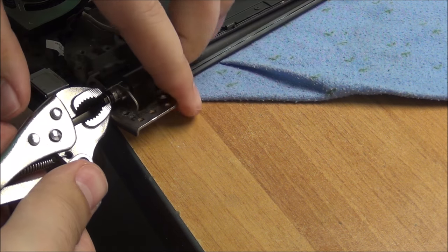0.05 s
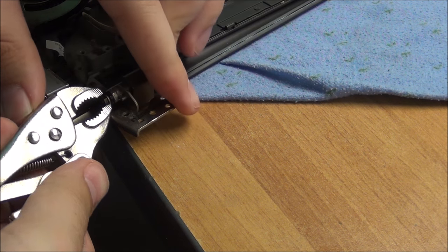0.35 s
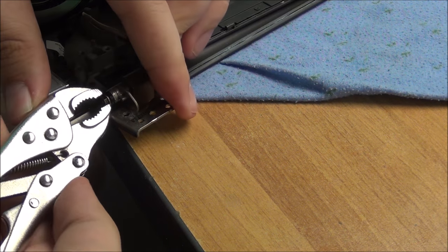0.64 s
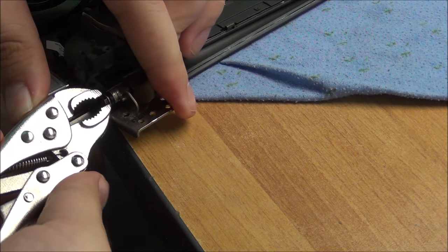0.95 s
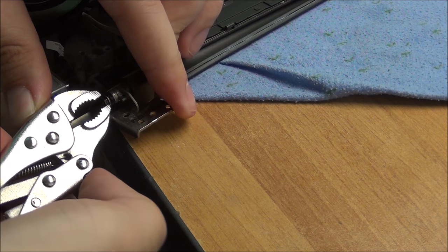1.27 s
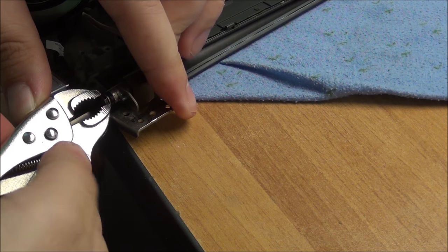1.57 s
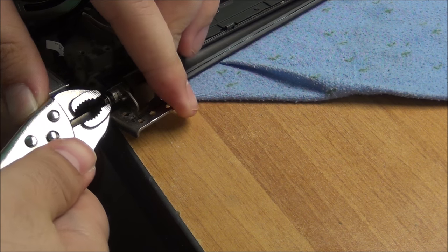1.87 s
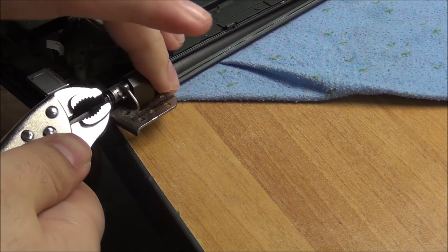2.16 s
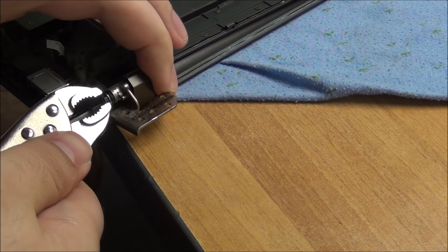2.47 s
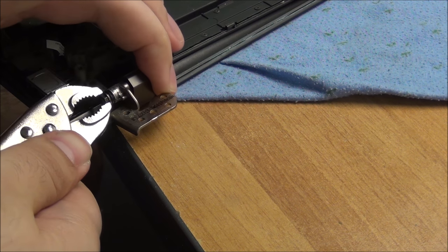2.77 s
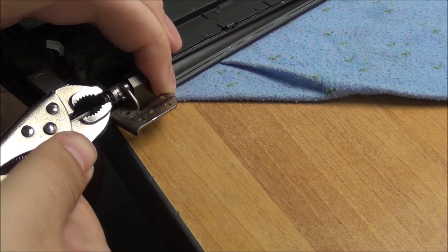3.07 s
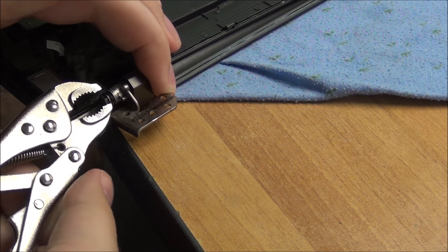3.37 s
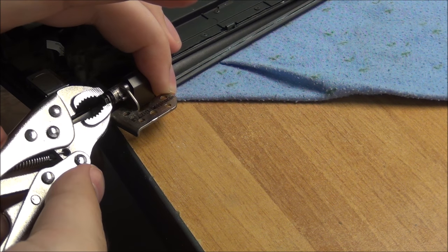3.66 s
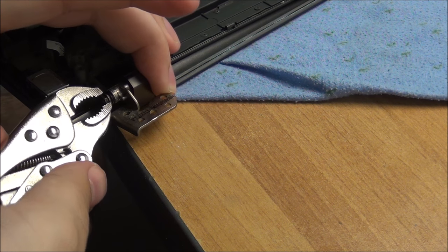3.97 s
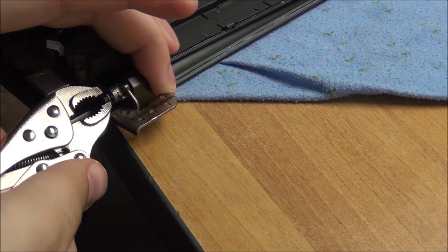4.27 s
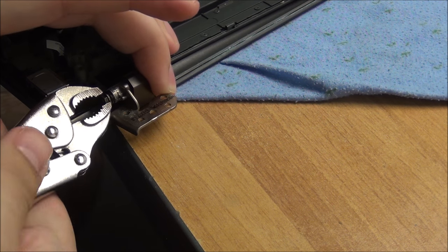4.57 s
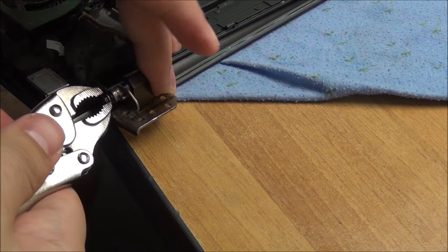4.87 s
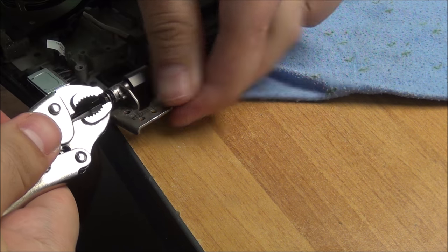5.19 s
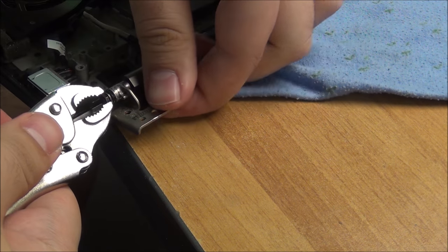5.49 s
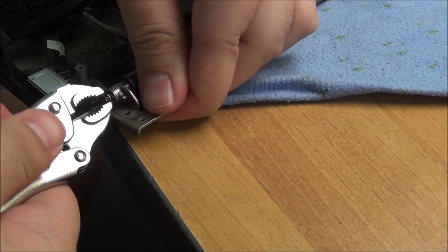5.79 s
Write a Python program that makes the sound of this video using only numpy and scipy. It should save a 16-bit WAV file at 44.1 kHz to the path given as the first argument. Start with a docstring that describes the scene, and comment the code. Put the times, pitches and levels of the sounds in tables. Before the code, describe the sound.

Locking pliers spring open and snap shut with sharp metallic cracks, amid small ticks and hollow knocks of a hinge in a plastic case.

```python
"""Locking pliers twist the steel shaft of a hinge in a plastic case on a wooden desk, in a quiet room.
A near camera hisses throughout; at first its focus motor pulses faintly. A hand bumps the case, then
the hinge knocks in it, exciting its modes and a thud of the desk. Near 3.2 s the pliers spring open and
the case bounces; they tick as they are shifted, and near 4 s snap shut with a crack and a steel ring.
More ticks, bumps and knocks follow, fingers rub with friction noise, and the motor runs again briefly."""
import sys
import numpy as np
from scipy import signal
from scipy.fft import rfft, irfft
from scipy.io import wavfile
from scipy.ndimage import uniform_filter1d

SR = 44100
rng = np.random.default_rng(int(sys.argv[2]) if len(sys.argv) > 2 else 0)


def transcribe(u):
    """Save the signal u as a 16-bit wav file named by the first command-line argument.

    u: samples, shape (n,) or (channels, n), limited to [-1, 1]; the rate is SR.
    q: integer samples, one column per channel.
    """
    v = np.clip(np.atleast_2d(u).T, -1, 1)
    q = np.round(v * 32767).astype(np.int16)
    wavfile.write(sys.argv[1], SR, q)


N = 265923
T = np.arange(SR // 4) / SR  # time axis of one blow [s]
SEAT_HZ, SEAT_LAG_S = 125, .011  # a knock or snap pushes the case onto the desk, a moment later
# spectrum of the hinge striking plastic: (frequency [Hz], spectral level [dB])
CLACK_SPECTRUM = [(60, -22), (200, -6), (330, -2), (620, 0), (830, -7), (1180, 1), (1600, -3), (1950, -8),
                  (2400, -6), (3000, -12), (5000, -28), (16000, -52)]


def gain_of(db):
    """Amplitude ratio of a level in decibels."""
    return np.exp(np.asarray(db) * (np.log(10) / 20))


def unit_rms(x):
    """Power normalisation: scales a signal to rms 1."""
    return x / np.sqrt(np.mean(x ** 2) + 1e-20)


def unit_blow(x):
    """Energy normalisation: scales a blow to the energy of 5 ms at full level."""
    return x * np.sqrt(SR / 200 / (np.sum(x ** 2) + 1e-20))


def curve_at(points, hz):
    """Interpolation of a table on a logarithmic frequency axis."""
    table_hz, values = np.transpose(points)
    return np.interp(np.log(hz + 1), np.log(table_hz + 1), values)


def place(mix, start_s, sound, left_db=0):
    """Level panning: adds a sound at start_s, left_db stronger on the left than on the right."""
    part = mix[:, round(start_s * SR):][:, :len(sound)]
    part += gain_of([[left_db / 2], [-left_db / 2]]) * sound[:part.shape[1]]


def colour(x, spectrum):
    """Minimum-phase filtering: a causal response with the given spectrum."""
    size = 4096
    log_gain = np.log(gain_of(curve_at(spectrum, abs(np.fft.fftfreq(size, 1 / SR)))))
    taps = np.fft.ifft(np.exp(signal.hilbert(log_gain).conj())).real[:size // 2]
    return signal.oaconvolve(x, taps)[:len(x)]


def band(x, low_hz, high_hz, order=4):
    """Band limiting by a contact of finite hardness: gentle below, steep above."""
    x = signal.sosfilt(signal.butter(2, low_hz, "high", fs=SR, output="sos"), x)
    return signal.sosfilt(signal.butter(order, high_hz, fs=SR, output="sos"), x)


def resonate(x, hz, width_hz):
    """Second-order resonance, with Q equal to frequency over bandwidth."""
    return signal.lfilter(*signal.iirpeak(hz, hz / width_hz, SR), x)


def air(level_db=-48):
    """Stationary noise: the powers of room air, camera hiss and whirring resonances add."""
    # air and hiss: (frequency [Hz], relative spectral level [dB])
    floor = [(20, -12), (40, -4), (60, 1), (90, -4), (160, -3), (250, -3), (430, -7), (650, -4), (900, -5),
             (1300, -5), (2000, -9), (3200, -15), (7000, -19), (15800, -23.3)]
    # whirring resonances: (frequency [Hz], half-width [Hz], rms level [dB])
    whirr = [(235, 45, -65), (635, 35, -60), (725, 28, -60.5), (835, 35, -67), (1060, 70, -66),
             (1260, 110, -63), (1950, 200, -64)]
    # likeness of the two channels: (frequency [Hz], coherence [0-1])
    likeness = [(60, 1.0), (130, 0.97), (290, 0.92), (640, 0.87), (1410, 0.81), (3100, 0.66), (6820, 0.84),
                (15000, 0.99)]
    hz = np.fft.rfftfreq(N, 1 / SR)
    power = (gain_of(level_db) * unit_rms(gain_of(curve_at(floor, hz)))) ** 2
    for centre_hz, width_hz, db in whirr:
        peak = 1 / (1 + ((hz - centre_hz) / width_hz) ** 2)
        power += (gain_of(db) * unit_rms(peak)) ** 2
    coherence = curve_at(likeness, hz)
    mid, side = rfft(rng.standard_normal((2, N)))
    mid, side = mid * np.sqrt((1 + coherence) / 2), side * np.sqrt((1 - coherence) / 2)
    spectra = np.array([mid + side, mid - side]) * np.sqrt(power)
    return irfft(spectra, N) * gain_of([[.3], [-.3]])


def focus_motor(step_hz=25, first_step_s=.033, fade_s=.04):
    """Amplitude modulation: the motor's regular steps pulse the resonances of the lens barrel."""
    # barrel resonances: (frequency [Hz], bandwidth [Hz], rms level [dB], modulation depth [0-1])
    barrel = [(232, 35, -58, .2), (1222, 70, -52.5, .95), (2430, 170, -65.5, .85)]
    # runs of the motor: (start [s], end [s], gain [dB])
    runs = [(0, 1.85, 0), (5.68, 6.03, -1)]
    t = np.arange(N) / SR
    pulse = np.cos(2 * np.pi * step_hz * (t - first_step_s))
    out = np.zeros(N)
    for hz, width_hz, db, depth in barrel:
        narrow_noise = resonate(resonate(rng.standard_normal(N), hz, width_hz), hz, width_hz)
        tone = np.cos(np.angle(signal.hilbert(narrow_noise)))  # steady amplitude, wandering phase
        out += gain_of(db) * unit_rms(tone * (1 + depth * pulse))
    running = sum(gain_of(db) * np.clip(1 + np.minimum(t - start, end - t) / fade_s, 0, 1)
                  for start, end, db in runs)
    return out * running


def chatter(decay_s):
    """Contact noise: a swarm of micro-impacts builds quickly and decays exponentially."""
    age = T / decay_s
    return rng.choice([-1., 1.], len(T)) * np.exp(-age) * (1 - np.exp(-3 * age))


def ring(modes, phase_spread):
    """Modal superposition: damped sinusoids of alternating sign, their phases scattered at random."""
    hz, db, t60 = np.transpose(modes)[:, :, None]
    sign = (-1) ** np.arange(len(hz))[:, None]
    phase = 2 * np.pi * hz * T + phase_spread * rng.standard_normal(hz.shape)
    return unit_blow((sign * gain_of(db - 60 * T / t60) * np.sin(phase)).sum(0))


def desk_thud(hz, decay_s=.019):
    """Heavily damped response: the contact shuffles around its pitch and the desk top gives once."""
    shuffle = unit_blow(band(chatter(decay_s), hz * .72, hz * 1.7, order=3))
    flex = unit_blow(np.sin(2 * np.pi * hz * .82 * T) * T * np.exp(-T / (decay_s * .45)))
    return unit_blow(shuffle + gain_of(-1) * flex)


def case_boom(rise_s):
    """Free vibration: the modes of the case swell and ring, and its loose parts shudder along."""
    # modes of the plastic case on the desk: (frequency [Hz], level [dB], T60 [s])
    modes = [(190, -11, .2), (232, -7, .2), (298, -4, .14), (335, -6, .12), (399, -4, .17), (425, -4, .12),
             (465, -4, .11), (518, -3, .15), (572, -6, .13), (624, -6, .12), (689, -12, .14),
             (867, -17, .12), (958, -11, .18), (1034, -15, .18), (1160, -9, .17)]
    # loose parts: (frequency [Hz], spectral level [dB])
    loose = [(40, -30), (170, -14), (300, -2), (450, 0), (620, -3), (800, -13), (1200, -16),
             (2500, -32), (8000, -65)]
    shudder = unit_blow(colour(chatter(decay_s=.021), loose))
    body = ring(modes, phase_spread=1.2) + gain_of(-1) * shudder
    return unit_blow(body * (1 - np.exp(-T / rise_s)))


def soft_bumps():
    """Soft impact: the force builds slowly, so only the low modes of desk and case answer."""
    # soft bumps on case and desk: the hands, and the case bouncing just after the pliers spring open:
    # (time [s], thud level [dB], thud pitch [Hz], boom level [dB])
    bumps = [(.89, -30.5, 155, -46), (1.718, -33, 155, -51), (2.062, -40, 120, -54), (2.119, -38, 245, -43),
             (2.15, -32, 160, -40), (2.767, -41, 150, -36), (3.079, -31, 265, -44), (3.12, -34, 255, -46),
             (3.219, -38, 130, -25), (4.286, -33, 165, -48), (4.699, -39, 150, -58), (4.811, -37, 135, -59),
             (4.957, -39, 125, -58), (5.15, -33, 220, -32), (5.244, -39, 115, -40), (5.717, -31, 150, -47),
             (5.789, -36, 125, -52), (5.895, -39, 130, -49)]
    out = np.zeros((2, N))
    for s, thud_db, hz, boom_db in bumps:
        place(out, s, gain_of(thud_db) * desk_thud(hz) + gain_of(boom_db) * case_boom(rise_s=.008))
    return out


def hinge_knocks():
    """Impact on coupled bodies: a steel edge clacks on plastic, the case booms and the desk thuds."""
    # the hinge shifts in its seat: (time [s], clack level [dB], boom level [dB], thud level [dB],
    # edge level [dB], edge cutoff [Hz])
    knocks = [(1.4945, -29.5, -38, -31, -41, 6000), (2.8432, -25, -16.5, -28, -31.5, 5000),
              (2.856, -26, -21, -38, -40, 3600), (2.88, -33, -29, -46, -44, 3600),
              (2.9245, -28, -24, -31, -36, 4000), (2.971, -26, -30, -30, -30, 10000),
              (3.459, -41, -37, -34, -44, 8500), (5.124, -35, -26.5, -30, -35, 7000),
              (5.133, -39, -33, -40, -43, 8000), (5.622, -31, -37, -44, -35.5, 6500),
              (5.66, -28, -48, -46, -32.5, 6300), (5.666, -28.5, -48, -46, -35, 6000)]
    out = np.zeros((2, N))
    for s, clack_db, boom_db, thud_db, edge_db, top_hz in knocks:
        edge = unit_blow(band(chatter(decay_s=.002), top_hz * .42, top_hz))
        clack = unit_blow(colour(chatter(decay_s=.0045), CLACK_SPECTRUM))
        place(out, s, gain_of(edge_db) * edge + gain_of(clack_db) * clack, left_db=1.4)
        place(out, s, gain_of(boom_db) * case_boom(rise_s=.002))
        place(out, s + SEAT_LAG_S, gain_of(thud_db) * desk_thud(SEAT_HZ))
    return out


def jaw_ticks():
    """Damped ringing: small steel parts touch, and the hand absorbs their cluster of modes."""
    # touches of jaws and linkage: (time [s], ring level [dB], ring pitch [Hz], click level [dB])
    ticks = [(3.128, -56, 7500, -55), (3.6311, -51, 7250, -53), (4.4114, -43, 3680, -48),
             (4.4965, -37, 3950, -39.5), (4.714, -38.5, 3560, -52), (4.7696, -49, 3300, -52),
             (4.8509, -52, 3400, -58), (5.0624, -55, 6800, -54), (5.5608, -50, 3750, -55)]
    # steel on steel: (frequency [Hz], spectral level [dB])
    click_spectrum = [(100, -25), (1500, -6), (4000, 0), (7500, 0), (10000, -5), (12000, -13), (16000, -17)]
    out = np.zeros((2, N))
    for s, ring_db, hz, click_db in ticks:
        # (frequency [Hz], level [dB], T60 [s])
        modes = [(hz, 0, .016), (hz * .92, -3, .008), (hz * 1.09, -5, .008), (hz * .64, -11, .008)]
        tone = ring(modes, phase_spread=1)
        click = unit_blow(colour(chatter(decay_s=.0012), click_spectrum))
        place(out, s, gain_of(ring_db) * tone + gain_of(click_db) * click, left_db=2.5)
    return out


def plier_snaps():
    """Snap-through: the toggle goes over centre with a crack, a steel ring and a kick to the case."""
    # opening and shutting: (time [s], ring level [dB], crack level [dB], crack decay [s],
    # boom level [dB], thud level [dB], rattle level [dB], left over right [dB])
    opening = (3.1604, -21, -10.3, .0018, -14.5, -24, -25, 2.2)
    shutting = (4.0451, -18, -12.6, .0015, -44, -34, -26, 3.2)
    # modes of the pliers, open and clamped on the shaft: (frequency [Hz], level [dB], T60 [s])
    open_modes = [(870, -9, .05), (1130, -3, .04), (1330, -7, .03), (1620, -8, .03), (2020, -12, .04),
                  (2420, 0, .018), (2750, -10, .015), (3150, -7, .025), (3330, -1, .02), (3950, -5, .018),
                  (4700, -4, .012), (5350, -3, .014), (5740, 0, .016), (6500, -9, .018), (6900, -9, .02),
                  (10150, -14, .02)]
    shut_modes = [(894, -12, .07), (1179, -8, .06), (1650, -4, .04), (1960, 0, .03), (2230, -3, .03),
                  (3020, -5, .025), (3280, -7, .04), (3850, -12, .025), (5170, -2, .022), (6180, -8, .02),
                  (6900, -10, .02), (7800, -6, .02), (8450, -6, .025), (9000, -9, .02), (9550, -7, .02),
                  (10300, -8, .03), (10950, -11, .025)]
    # crack of each snap: (frequency [Hz], spectral level [dB])
    open_crack = [(40, -45), (180, -15), (350, -1), (600, 2), (800, -4), (1150, 1), (1930, -5), (2400, -1),
                  (3300, -1), (4300, -5), (5700, -1), (7000, -12), (8100, -21), (10200, -16), (11300, -27),
                  (16000, -30)]
    shut_crack = [(40, -40), (180, -21), (500, -8), (1340, -3), (1750, 2), (2150, 3), (2700, -7),
                  (3290, -3), (4520, -13), (5100, -4), (5800, -12), (9400, -4), (11100, -13), (12300, -21),
                  (16000, -22)]
    out = np.zeros((2, N))
    for snap, modes, spectrum in ((opening, open_modes, open_crack), (shutting, shut_modes, shut_crack)):
        s, ring_db, crack_db, decay_s, boom_db, thud_db, rattle_db, left_db = snap
        steel = unit_blow(ring(modes, phase_spread=.8) * (1 - np.exp(-T / .0007)))
        crack = unit_blow(colour(chatter(decay_s), spectrum))
        place(out, s, gain_of(ring_db) * steel + gain_of(crack_db) * crack, left_db)
        rattle = unit_blow(band(colour(chatter(decay_s=.022), CLACK_SPECTRUM), 620, 9000))
        place(out, s, gain_of(boom_db) * case_boom(rise_s=.003) + gain_of(rattle_db) * rattle)
        place(out, s + SEAT_LAG_S, gain_of(thud_db) * desk_thud(SEAT_HZ))
    return out


def finger_rubbing(grain_db=2.5):
    """Stick-slip friction: skin catches in tiny grains whose noise follows the finger's pressure."""
    # strokes over hinge and cloth: (time of peak [s], level [dB], swell [s], fade [s])
    strokes = [(5.255, -41.5, .02, .022), (5.42, -55, .1, .1), (5.575, -44.5, .025, .035),
               (5.685, -42, .04, .035), (5.92, -52, .12, .1)]
    # friction noise: (frequency [Hz], spectral level [dB])
    spectrum = [(60, -25), (300, -4), (700, -2), (1100, 0), (2000, -7), (3500, -11), (7000, -17),
                (16000, -25)]
    t = np.arange(N) / SR
    pressure = sum(gain_of(db) * np.exp(-((t - s) / np.where(t < s, swell_s, fade_s)) ** 2)
                   for s, db, swell_s, fade_s in strokes)
    noise = rng.standard_normal(N)
    roughness = unit_rms(uniform_filter1d(rng.standard_normal(N), size=60))
    grains = noise * gain_of(grain_db * roughness)
    return unit_rms(colour(grains, spectrum)) * pressure


def room(x, early_db=-8, early_decay_s=.007, late_db=-12, width=.65, wide_hz=1100):
    """Reflection and reverberation: desk and case return close echoes, the walls a short tail."""
    # reverberation time: (frequency [Hz], T60 [s])
    decay_times = [(100, .5), (300, .38), (700, .32), (2000, .25), (5000, .19), (10000, .16), (16000, .1)]
    # what the walls give back: (frequency [Hz], gain [dB])
    walls = [(60, -2), (400, 1), (1100, 2), (2000, -1), (4000, -4.5), (8000, -4), (16000, -1)]
    mid, side = rng.standard_normal((2, len(T))) * (rng.random((2, len(T))) < .15)
    # long waves reach both channels alike
    side = width * signal.lfilter(*signal.butter(1, wide_hz, "high", fs=SR), side)
    taps = np.array([mid + side, mid - side])
    early = taps * (T > .0025) * np.exp(-T / early_decay_s)
    early = signal.lfilter(*signal.butter(1, 600, "high", fs=SR), early)  # small faces return little bass
    hz, t, spectra = signal.stft(taps[:, ::-1], SR, nperseg=256)
    decay = gain_of(-60 * t / curve_at(decay_times, hz)[:, None])
    late = signal.istft(spectra * decay, SR, nperseg=256)[1][:, :len(T)]
    late *= np.clip((T - .004) / .008, 0, 1)
    late = np.array([colour(channel, walls) for channel in late / np.linalg.norm(late[0])])
    echoes = gain_of(early_db) * early / np.linalg.norm(early[0]) + gain_of(late_db) * late
    return x + signal.fftconvolve(x, echoes, axes=1)[:, :N]


def scene():
    """Superposition: the work on the desk sounds in the room, over the air and the camera's motor."""
    work = plier_snaps() + hinge_knocks() + jaw_ticks() + soft_bumps() + finger_rubbing()
    return room(work) + air() + focus_motor()


def record(dry, threshold_db=-17, slope=.26, recovery_db_per_s=2.5, ceiling=.95, cutoff_hz=16050):
    """Compression: the gain dips after loud snaps and creeps back; peaks round off; the top is cut."""
    power_db = 10 * np.log10(abs(uniform_filter1d((dry ** 2).mean(0), size=200)) + 1e-12)
    demand_db = slope * np.maximum(power_db - threshold_db, 0)
    recovery_db = np.arange(N) / SR * recovery_db_per_s
    dip_db = np.maximum.accumulate(demand_db + recovery_db) - recovery_db
    dip_db = signal.lfilter([1 / 1500], [1, 1 / 1500 - 1], dip_db)  # 34 ms attack
    compressed = dry / gain_of(dip_db)
    rounded = compressed / (1 + (compressed / ceiling) ** 6) ** (1 / 6)
    low_pass = signal.firwin(511, cutoff_hz, window=("kaiser", 9), fs=SR)
    return signal.oaconvolve(rounded, low_pass[None], "same")


dry = scene()
out = record(dry)
transcribe(out)
```